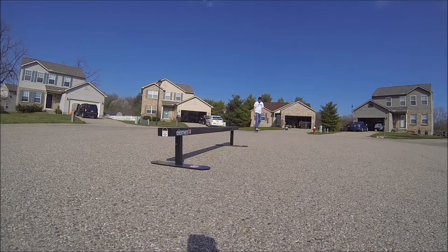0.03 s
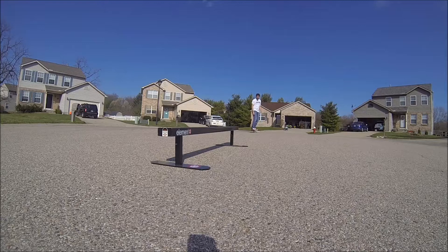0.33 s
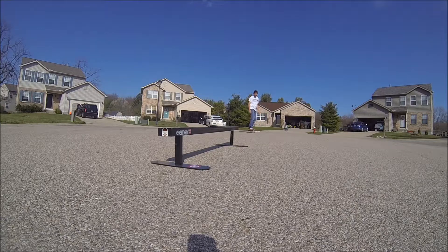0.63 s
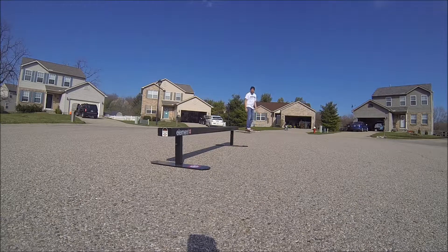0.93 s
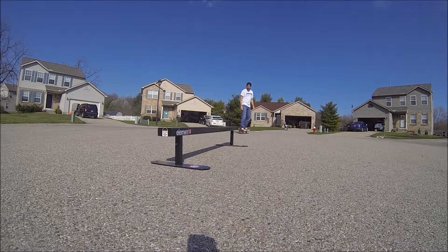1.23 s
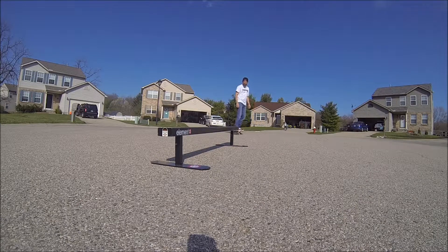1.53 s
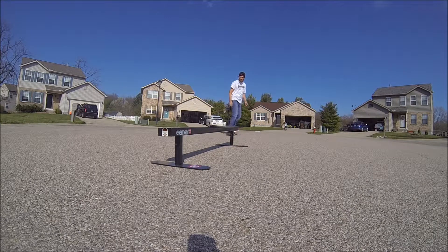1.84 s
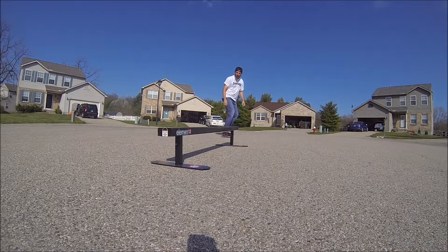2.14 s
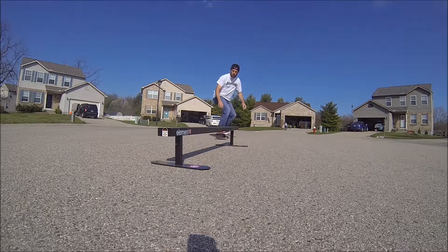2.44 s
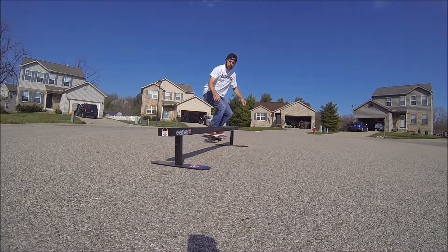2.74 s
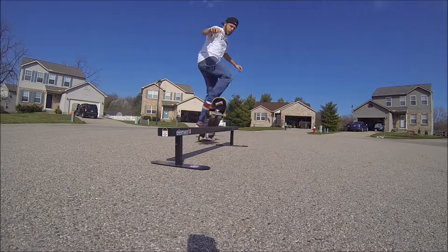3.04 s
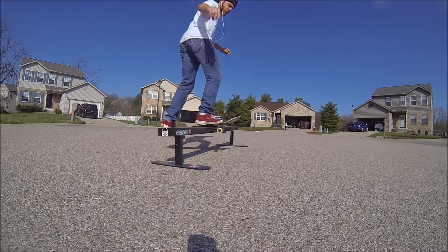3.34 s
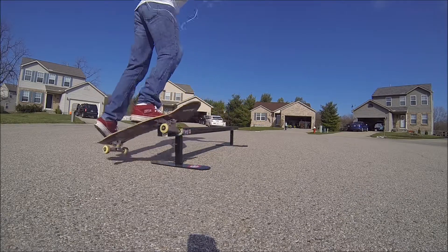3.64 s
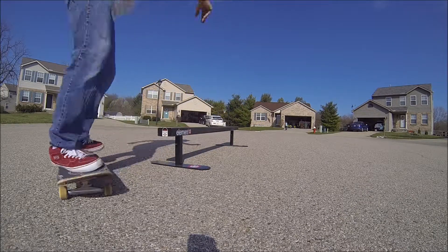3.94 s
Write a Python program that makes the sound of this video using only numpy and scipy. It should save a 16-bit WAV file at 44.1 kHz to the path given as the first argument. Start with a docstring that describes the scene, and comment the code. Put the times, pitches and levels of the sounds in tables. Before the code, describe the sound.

A skateboard rolls over rough asphalt towards a low microphone, growing louder. It pops, scrapes briefly along a ringing steel rail, then clatters onto the street and rolls on, with light wind and a low hum underneath.

```python
"""A skateboard rolls up over rough asphalt towards a low microphone, pops off its tail and lands on
a hollow steel rail. Grit drums through the wheels, and each blow knocks a woody note out of the deck.
The trucks stick and slip along the ringing rail, then the board clatters to the street and rolls on.
Light wind and a low hum lie underneath, and the house fronts give a faint echo."""
import sys
import numpy as np
from scipy import signal
from scipy.fft import rfft, irfft
from scipy.io import wavfile

SR = 44100
rng = np.random.default_rng(int(sys.argv[2]) if len(sys.argv) > 2 else 0)


def store_pcm(level_fs):
    """Save levels as 16-bit WAV."""
    pcm = np.round(np.clip(level_fs, -1, 1) * 32767).astype(np.int16)
    wavfile.write(sys.argv[1], SR, np.atleast_2d(pcm).T)


N = 176400
T = np.arange(N) / SR

# fader ride of the rolling wheels: t/s, level/dB
ROLL_LEVEL = [(.14, -36), (1.3, -36), (1.85, -35), (2.35, -31), (2.8, -29), (2.89, -24), (3.01, -28.5),
              (3.04, -22.5), (3.085, -22), (3.125, -34), (3.17, -50), (3.8, -33), (3.86, -37), (4.0, -39.5)]
# tail pop, hits on the rail, landing: t/s, knock level/dB, focus f/Hz, crack level/dB, rail level/dB
BLOWS = [(3.0853, -11.5, 1580, -22, -97), (3.0897, -4.5, 835, -19, -105), (3.0926, -8.5, 1170, -38, -93),
         (3.2078, -1.5, 349, -15.5, -24.5), (3.2548, -6.5, 920, -23, -17.5), (3.2803, -18.5, 628, -23, -25),
         (3.4735, -16.5, 640, -21.5, -23.5), (3.7918, -3, 383, -13, -53), (3.8176, -8.5, 420, -12.5, -50),
         (3.8215, -12.5, 517, -14, -45), (3.8337, -7.5, 1040, -16, -52), (3.8385, -13, 1020, -10, -47),
         (3.8442, -14, 1090, -12.5, -60), (3.8505, -6, 440, -19.5, -58), (3.989, -9.5, 714, -18, -52)]
# trucks scraping the rail: t/s, length/s, growl level/dB, rasp level/dB, hiss level/dB
SCRAPES = [(3.208, 0.054, -31, -32.5, -42), (3.262, 0.018, -26.5, -38.5, -55),
           (3.468, 0.079, -30, -43.5, -57), (3.544, 0.097, -33, -34.5, -52.5),
           (3.654, 0.075, -28.5, -42.5, -73), (3.732, 0.056, -25, -35, -42.5)]
# midrange bite of scraped metal: f/Hz, level/dB
RASP_EQ = [(700, -10.5), (1400, 5.5), (1900, 6), (2300, -7), (2750, 8), (3400, 0.5), (4400, -9),
           (5400, -17), (6800, -54), (15000, -66)]
# bright sizzle of a hard contact: f/Hz, level/dB
HISS_EQ = [(3000, 4), (5500, 17), (7300, 5.5), (9200, 13), (10800, -11), (12500, 0), (15000, -7)]


def undb(db):
    return 10 ** (np.asarray(db) / 20)


def unit(x):
    """Scale to rms 1."""
    return x / np.sqrt(np.mean(x ** 2))


def curve(table, column=1):
    """Gain over time from a dB column."""
    rows = np.array(table)
    return undb(np.interp(T, rows[:, 0], rows[:, column]))


def ring(x, response):
    """Pass a force through an impulse response."""
    return signal.fftconvolve(x, response)[:N]


def colour(x, points, tilt_db=0, size=4096):
    """Minimum-phase EQ through (f/Hz, level/dB) points, tilted per octave; keeps white noise's power."""
    hz, db = np.array(points).T
    octave = np.log2(np.maximum(np.fft.rfftfreq(size, 1 / SR), 1))
    octaves_below = np.maximum(np.log2(hz[0]) - octave, 0)
    gain = undb(np.interp(octave, np.log2(hz), db) + tilt_db * octave - 10 * octaves_below)
    cepstrum = irfft(np.log(gain))
    cepstrum[1:size // 2] *= 2
    cepstrum[size // 2 + 1:] = 0
    response = irfft(np.exp(rfft(cepstrum)))
    return ring(x, response / np.linalg.norm(response))


def noise():
    return rng.standard_normal(N)


def walk(per_s):
    """Smooth random wander, spread near 1."""
    knots = rng.standard_normal(4096)
    return 1.2 * np.interp(T * per_s, np.arange(len(knots)), knots)


def band(hz, width_hz):
    """A rough resonance: its strength and phase waver within a narrow band."""
    phase = 2 * np.pi * np.cumsum(hz * np.ones(N)) / SR
    return walk(width_hz) * np.sin(phase) + walk(width_hz) * np.cos(phase)


def grit(per_s, spread_db):
    """Dense tiny impacts, a few stronger than the rest."""
    size = undb(spread_db * np.minimum(rng.exponential(size=N), 5))
    hits = rng.random(N) < per_s / SR
    return unit(hits * size * np.sign(noise()))


def fade(start, decay_s):
    """Sudden onset, exponential decay."""
    return (T >= start) * np.exp(-np.clip((T - start) / decay_s, 0, 50))


def stroke(start, length, attack_s=0.0098, release_s=0.014):
    """Attack, hold and release of a sliding contact."""
    attack = np.clip((T - start) / attack_s, 0, 1)
    return attack * np.exp(-np.clip((T - start - length) / release_s, 0, 50))


def modes(table, count):
    """Decaying partials of a struck body."""
    t = T[:count]
    return sum(undb(db - 60 * t / t60) * np.sin(2 * np.pi * hz * t) for hz, db, t60 in table)


def add(out, start, x):
    """Mix x in at a time."""
    i = min(int(start * SR), N - 1)
    out[i:i + len(x)] += x[:N - i]


def air(hum_hz=81.3):
    """The bed: a wavering low hum, gusts on the microphone and a faint steady hiss."""
    # fader rides of the bed: t/s, hum level/dB, wind level/dB
    levels = [(.14, -37, -39.5), (1.2, -38, -45), (2.3, -41, -47), (3.0, -45, -53.5), (4.0, -45, -43.5)]
    # wind rumble: f/Hz, level/dB
    wind_eq = [(15, -1.5), (30, 15.5), (60, 0.5), (120, -29.5), (400, -40), (15000, -100)]
    # steady hiss: f/Hz, level/dB
    floor_eq = [(1000, 4), (4000, -9), (7000, -24.5), (9600, -19.5), (11200, -29), (13000, -19),
                (15000, -35)]
    pitch = hum_hz * (1 + 0.0314 * walk(24))
    hum = np.sin(2 * np.pi * np.cumsum(pitch) / SR) * undb(2 * walk(20.99))
    wind = colour(noise(), wind_eq) * undb(2.5 * walk(11))
    hiss = undb(-61) * colour(noise(), floor_eq)
    return unit(hum) * curve(levels, column=1) + unit(wind) * curve(levels, column=2) + hiss


def street_echo(direct, lag_s=0.023, t60_s=0.56):
    """The house fronts throw back a short, diffuse tail."""
    wash = colour(noise(), [(100, -2), (2500, -5.0), (12000, 0.5)])
    tail = wash * fade(lag_s, t60_s / np.log(1000))
    return ring(direct, tail / np.linalg.norm(tail))


def grains(from_s=2.768, rise_s=0.17):
    """Loose grains crunch under the wheels, heard only once the board is close."""
    # crisp top of the crunch: f/Hz, level/dB
    crunch_eq = [(1500, 11), (3700, -12.5), (4800, -4), (6700, -25), (8800, -13.5), (11000, -32),
                 (15000, -29)]
    impacts = np.abs(grit(per_s=450, spread_db=0.8))
    snaps = unit(ring(impacts, fade(0, decay_s=0.0028)) * noise())
    close = np.clip((T - from_s) / rise_s, 0, 1)
    return undb(-17) * close * curve(ROLL_LEVEL) * colour(snaps, crunch_eq)


def drone():
    """A rough low resonance of the rolling board climbs just before the pop."""
    # rising boom of the board: t/s, f/Hz, level/dB
    sweep = [(2.83, 124.5, -42.5), (2.88, 141, -30), (2.94, 227.8, -30), (3.0, 234.6, -31.5),
             (3.04, 275, -24), (3.075, 324, -20.5), (3.11, 362, -51)]
    times, hz, _ = np.array(sweep).T
    return band(np.interp(T, times, hz), width_hz=50) * curve(sweep, column=2)


def squeals():
    """Sliding contacts catch for a moment in a hoarse squeal."""
    # squeals of trucks and wheels: t/s, length/s, f/Hz, level/dB
    catches = [(3.501, 0.0051, 5400, -42), (3.541, 0.013, 5340, -44), (3.59, 0.019, 5270, -40),
               (3.961, 0.03, 3100, -36)]
    return sum(undb(db) * stroke(s, length) * band(hz, width_hz=810) for s, length, hz, db in catches)


def rattles():
    """Sharp metal ticks from the trucks, on the rail and after the landing."""
    # truck ticks: t/s, level/dB
    cues = [(3.555, -24), (3.675, -29), (3.757, -17.5), (3.7594, -29), (3.871, -28), (3.899, -28),
            (3.904, -31), (3.9319, -24.5), (3.9445, -28), (3.951, -32), (3.973, -24), (3.979, -27)]
    ticks = noise() * sum(undb(db) * fade(s, decay_s=0.0021) for s, db in cues)
    return colour(ticks, RASP_EQ) + undb(-20) * colour(ticks, HISS_EQ)


def wheels(far_until_s=1.7, near_at_s=2.25):
    """Asphalt grit drums through the wheels into the deck, fuller as it nears; stones knock."""
    # wheels and deck from afar: f/Hz, level/dB
    far_eq = [(59, -21), (109, -23), (231, -3.5), (345, -11.5), (472, -6), (558, -10.5), (688, -3),
              (983, -14), (1160, -28.5), (1730, -29), (2320, -43.5), (3110, -39), (5600, -53), (15000, -71)]
    # wheels and deck close up: f/Hz, level/dB
    near_eq = [(60, -22.5), (132, -4), (229, -1.5), (408, -5.5), (679, 2), (916, -3), (1210, -22),
               (1750, -26), (2420, -43), (3050, -33), (3650, -46.5), (4500, -40), (6090, -56),
               (8620, -49.5), (15000, -92)]
    # wheels hitting stones and cracks: t/s, level/dB
    bumps = [(0.792, -26), (1.39, -26), (1.589, -20), (1.734, -30), (1.772, -25.5), (1.875, -19.5),
             (1.958, -25.5), (3.036, -31), (3.065, -15)]
    road = grit(per_s=2500, spread_db=2) * undb(1.85 * walk(35))
    near = np.clip((T - far_until_s) / (near_at_s - far_until_s), 0, 1)
    roll = (1 - near) * colour(road, far_eq) + near * colour(road, near_eq)
    knocks = noise() * sum(undb(db) * fade(s, decay_s=0.0074) for s, db in bumps)
    return roll * curve(ROLL_LEVEL) + colour(knocks, far_eq, tilt_db=0.5)


def rail(shimmer_t60_s=0.6, drive_db=-2.5):
    """The hollow rail rings when struck and sings under the scraping."""
    # modes of the steel rail: f/Hz, level/dB, t60/s
    steel_modes = [(511, -19.5, 0.86), (670, -16, .5), (811, -3.5, 0.59), (840, -8, .5), (900, -5.5, 0.45),
                   (968, -14, 0.42), (1257, -21, 0.74), (1590, -18.5, 0.78), (1690, -21, 1.2),
                   (2546, -20, 0.75), (3122, -17, 1.5)]
    # its many faint overtones: f/Hz, level/dB
    shimmer_eq = [(150, 2), (500, -28.5), (850, 15.5), (1200, -8.5), (1700, -1), (2300, -11), (3100, -11),
                  (5000, -18.5), (7000, -39), (15000, -71)]
    shimmer = colour(noise(), shimmer_eq) * undb(-60 * T / shimmer_t60_s)
    response = modes(steel_modes, count=SR) / 2 + undb(-10) * shimmer[:SR]
    rubbing = sum(undb(db + drive_db) * stroke(s, length) for s, length, db, _, _ in SCRAPES)
    force = rubbing * noise() / np.linalg.norm(response)
    for s, _, _, _, db in BLOWS:
        add(force, s, undb([db]))
    return ring(force, response)


def grind():
    """Trucks stick and slip on steel: the board growls, the metal rasps and hisses."""
    # throaty body of the scraping board: f/Hz, level/dB
    growl_eq = [(80, -51), (220, -13.5), (400, -11.5), (520, 2), (640, -9.5), (830, -3), (1000, -28.5),
                (1250, -13), (3000, -61.5)]
    slips = grit(per_s=2200, spread_db=1.5) * undb(3 * walk(110))
    growl = colour(slips, growl_eq)
    rasp = colour(slips, RASP_EQ)
    hiss = colour(unit(slips + noise() / 2), HISS_EQ)
    return sum(stroke(s, length) * (undb(growl_db) * growl + undb(rasp_db) * rasp + undb(hiss_db) * hiss)
               for s, length, growl_db, rasp_db, hiss_db in SCRAPES)


def board(focus_octaves=0.32, attack_s=0.00038):
    """Each blow rings the deck with a short crack; the place struck favours modes near one pitch."""
    # modes of deck and trucks: f/Hz, level/dB, t60/s
    deck_modes = [(271, -16.5, 0.14), (376, 6, 0.027), (523, 7.5, 0.024), (736, 15, 0.05), (818, 11, 0.045),
                  (1052, 10, 0.043), (1540, 26.5, 0.012), (2122, 17, 0.04)]
    # crack of the impact: f/Hz, level/dB
    crack_eq = [(59, -68), (100, -34), (172, 5), (330, -5.5), (443, 4), (1050, 2), (1430, -9.5),
                (2130, -11.5), (2470, -19.5), (2990, -12.5), (5720, -35), (6910, -53), (8700, -46.5),
                (15000, -55)]
    # the deck radiates little bass; the contact softens the top
    body_filter = signal.butter(3, [280, 4500], "bandpass", fs=SR, output="sos")
    knocks = np.zeros(N)
    for s, peak_db, focus_hz, _, _ in BLOWS:
        struck = [(hz, db - 10 * np.log10(1 + (np.log2(hz / focus_hz) / focus_octaves) ** 4), t60)
                  for hz, db, t60 in deck_modes]
        knock = signal.sosfilt(body_filter, modes(struck, count=4000))
        knock *= 1 - np.exp(-T[:len(knock)] / attack_s)
        add(knocks, s, undb(peak_db) * knock / np.abs(knock).max())
    cracks = noise() * sum(undb(db) * fade(s, decay_s=0.0064) for s, _, _, db, _ in BLOWS)
    return knocks + colour(cracks, crack_eq, tilt_db=2.5) + undb(-34) * colour(cracks, HISS_EQ)


def scene():
    """Board and rail up front, a touch of street echo and the bed beneath, in mono."""
    direct = wheels() + grains() + drone() + board() + grind() + rail() + rattles() + squeals()
    return (direct + undb(-20) * street_echo(direct) + air())[None]


def record(dry, start_s=0.14, fade_in_s=0.0044, top_hz=15100):
    """The sound cuts in, peaks clip at full scale and a steep low-pass takes off the top."""
    opened = np.clip((T - start_s) / fade_in_s, 0, 1)
    lowpass = signal.ellip(8, .2, 70, top_hz, fs=SR, output="sos")
    return signal.sosfilt(lowpass, np.clip(dry * opened, -1, 1))


dry = scene()
out = record(dry)
store_pcm(out)
```